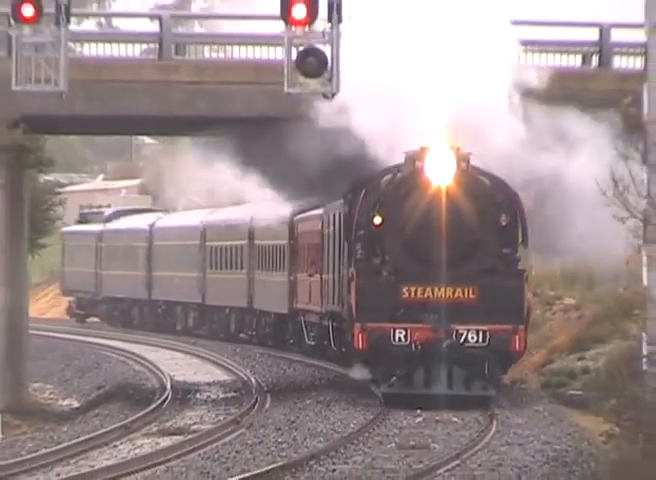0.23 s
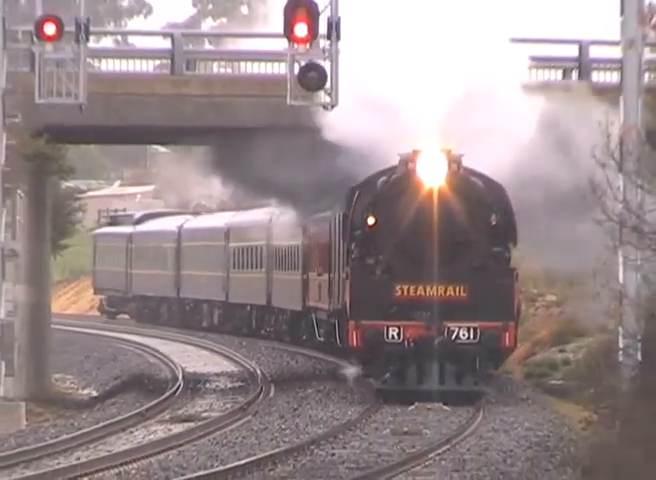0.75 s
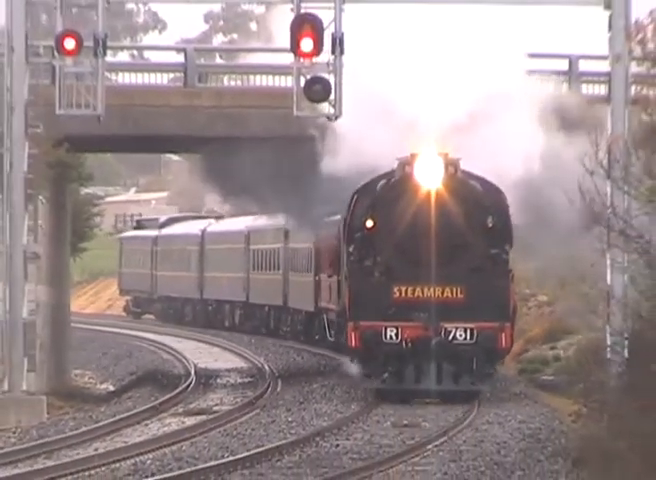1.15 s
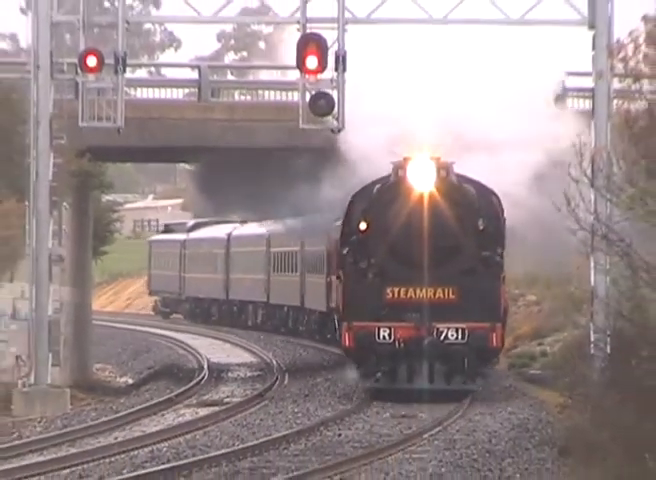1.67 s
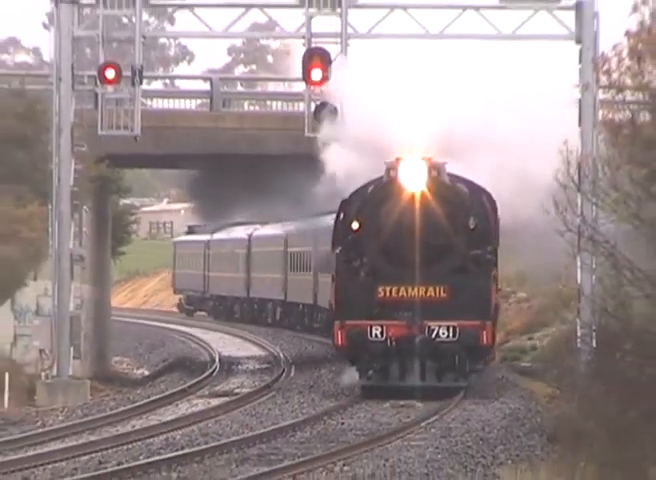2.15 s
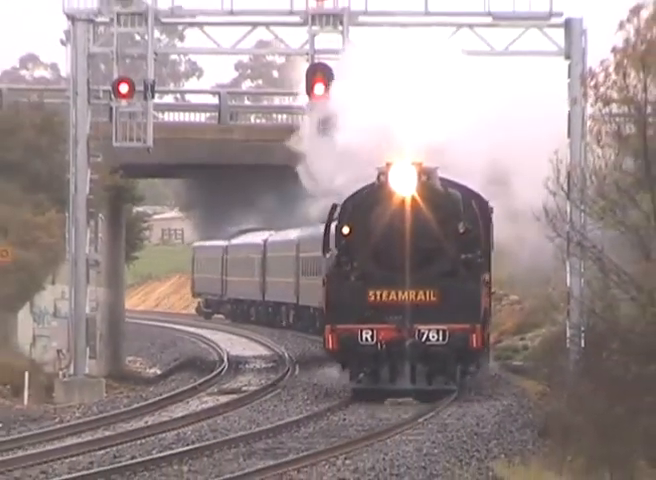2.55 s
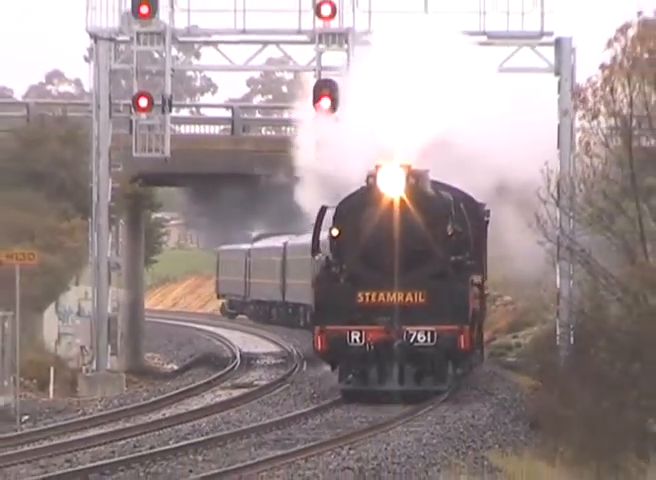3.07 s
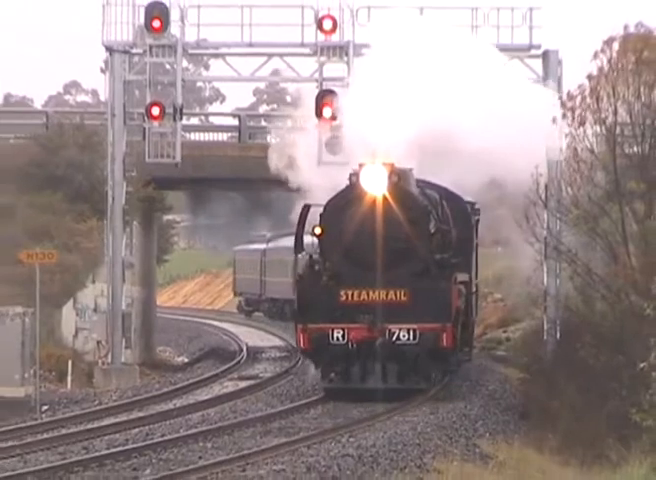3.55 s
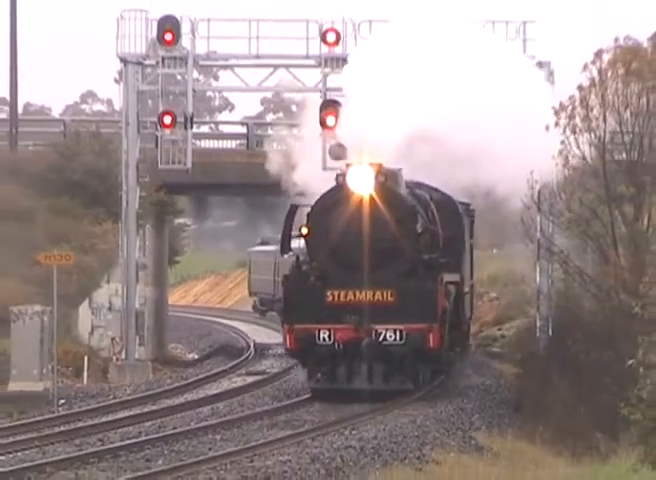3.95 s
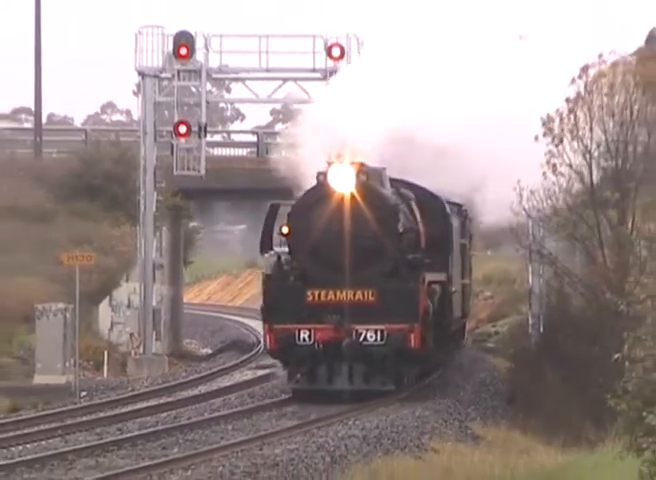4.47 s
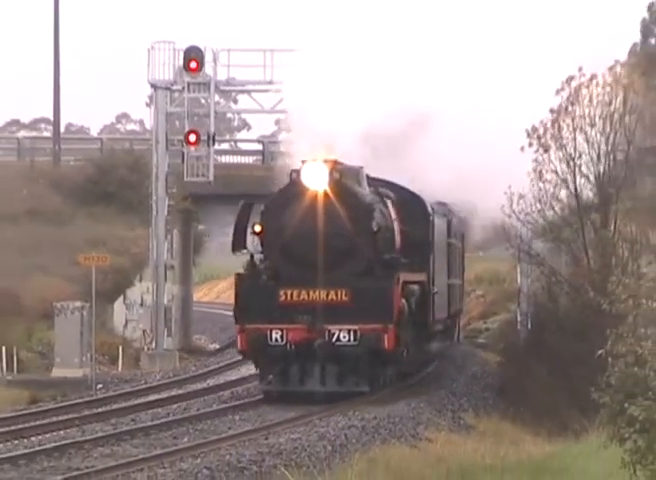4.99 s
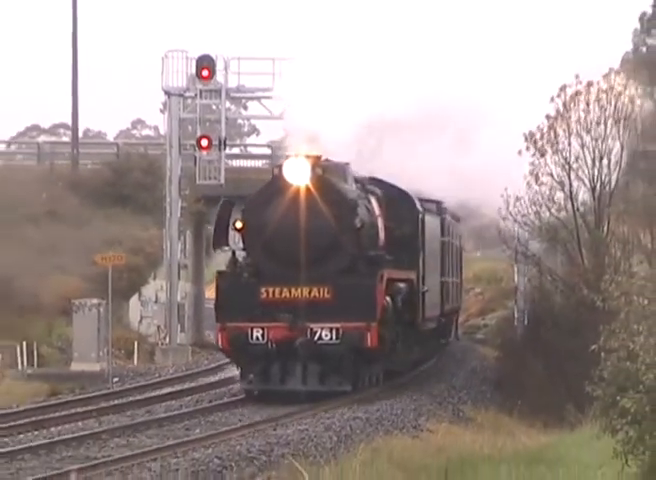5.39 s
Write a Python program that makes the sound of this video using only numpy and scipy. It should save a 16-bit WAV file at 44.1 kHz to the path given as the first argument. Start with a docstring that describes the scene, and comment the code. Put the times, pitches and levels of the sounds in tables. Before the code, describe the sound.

Loud, surging steam hiss grows as a locomotive draws near, its chimney throbbing and wheels thudding over rail joints while wind buffets the microphone.

```python
"""Steam locomotive blowing off

An engine rolls under a road bridge and draws near with its train, blowing off steam by the cylinders.
The jets hiss, sing, surge, spit water and ring in their drain pipes. Beneath them the chimney roars
and throbs, the wheels rumble and knock over rail joints, and the coaches follow with an even rush.
Gusts buffet the stereo microphone at the lineside, and a small bird chirps once."""
import sys
import numpy as np
from scipy import signal
from scipy.fft import rfft, irfft, next_fast_len
from scipy.io import wavfile
from scipy.ndimage import uniform_filter1d

SR = 44100
rng = np.random.default_rng(int(sys.argv[2]) if len(sys.argv) > 2 else 0)


def output_pcm(signal):
    """Save a mono or channel-first signal as 16-bit PCM at the path in sys.argv[1].

    Samples are clipped to [-1, 1] before scaling.
    """
    pcm = np.clip(np.atleast_2d(signal).T, -1, 1) * 32767
    wavfile.write(sys.argv[1], SR, np.round(pcm).astype(np.int16))


N = 248283
TIME = np.arange(N) / SR
SIZE = next_fast_len(N, True)
HZ = np.maximum(np.arange(SIZE // 2 + 1) * SR / SIZE, 1)

# the engine's low end, wheels and exhaust: time_s, rumble_gain_db, throb_gain_db
LOW_END = [(0, -51, -48.5), (.75, -49.5, -46), (1.1, -48.5, -46), (2.2, -45, -45), (3, -44.5, -44),
           (3.6, -45, -48.5), (4.3, -43, -40.5), (4.45, -44, -43.5), (4.62, -44, -46.5), (5.05, -43, -40.5),
           (5.28, -40.5, -52), (5.45, -39, -46), (5.63, -42.5, -48)]


def from_db(db):
    return 10 ** (np.asarray(db) / 20)


def rms_one(x):
    return x / np.sqrt(np.mean(x ** 2) + 1e-20)


def in_time(rows):
    """One envelope per value column, in straight lines between breakpoints."""
    times, *columns = np.transpose(rows)
    return [np.interp(TIME, times, column) for column in columns]


def bell(peak_s, sigma_s):
    """A rounded swell of height 1."""
    return np.exp(-.5 * ((TIME - peak_s) / sigma_s) ** 2)


def burst(peak_s, attack_s, release_s):
    """An exponential rise to 1 and an exponential fall."""
    return np.exp(-np.maximum((peak_s - TIME) / attack_s, (TIME - peak_s) / release_s))


def over_hz(points):
    """Breakpoints joined by straight lines on a log-frequency axis."""
    hz, value = np.transpose(points)
    return np.interp(np.log(HZ), np.log(hz), value)


def colour(points):
    """Gain of an EQ curve that rolls off beyond its ends."""
    skirts = np.minimum(HZ / points[0][0], 1) * np.minimum(points[-1][0] / HZ, 1)
    return from_db(over_hz(points)) * skirts ** 2


def resonances(modes):
    """Gain of rounded peaks that add in power."""
    powers = (from_db(2 * db) / (1 + ((HZ - hz) / width * 1.41) ** 2) ** 2 for hz, width, db in modes)
    return np.sqrt(sum(powers))


def white():
    """The spectrum of fresh white noise."""
    return rfft(rng.standard_normal(SIZE))


def drift(rate_hz):
    """A smooth random wobble; rms 1."""
    return rms_one(irfft(white() / (1 + (HZ / rate_hz) ** 2), SIZE)[:N])


def steady(x, span_s):
    """Level a noise so that its mean power stays near 1 over the given span."""
    power = uniform_filter1d(np.mean(np.atleast_2d(x) ** 2, axis=0), max(int(span_s * SR), 2))
    return x / np.sqrt(power + 1e-20)


def airborne(gain, span_s=0.41):
    """Coloured noise at the two capsules: a direct wave plus scatter from the cutting; rms about 1."""
    # stereo width: freq_hz, side_level_db
    scatter_share = [(80, -22), (300, -12), (550, -12.5), (1000, -13.5), (1800, -17), (2500, -13.5),
                     (4000, -12.5), (6000, -10), (7000, -55)]
    # stereo balance: freq_hz, left_minus_right_db
    balance = [(60, 2.5), (200, 4), (320, 2), (450, 4.5), (750, 1), (1500, 0.8), (4000, -1.2), (7000, -0.5)]
    # phase between the capsules: freq_hz, left_lead_rad
    phase_lead = [(300, -0.55), (800, .06), (2000, 0.0017), (3000, -0.1), (4500, 0.51), (6100, 0.74),
                  (6700, -0.15)]
    sides = np.array([[1], [-1]])
    direct = white() * np.exp(.5j * sides * over_hz(phase_lead))
    scatter = sides * white() * from_db(over_hz(scatter_share))
    pan = from_db(sides * over_hz(balance) / 2)
    return steady(irfft((direct + scatter) * gain * pan, SIZE)[:, :N], span_s)


def breathy(pitch_hz, width_hz):
    """A narrow band of noise carried along a pitch; rms about 1."""
    centre_hz = np.mean(pitch_hz)
    band = airborne(resonances([(centre_hz, width_hz, 0)]), span_s=0.074)
    glide = np.exp(2j * np.pi * np.cumsum(pitch_hz - centre_hz + np.zeros(N)) / SR)
    return np.real(signal.hilbert(band, SIZE)[:, :N] * glide)


def steam_jets(hiss_db=-1.27, sizzle_db=-4.5, pipe_db=-4.5, flutter_db=0.48, sputter_db=1.13):
    """Turbulent jets: a broad hiss, ringing pipes, and a sizzle that flares with wet steam."""
    # the flow as the engine nears: time_s, gain_db, ring_boost_db
    flow = [(0, -31.5, 3.5), (1.1, -30, 0.5), (1.5, -28, 0.5), (2.05, -28, 2.5), (2.92, -29.5, 1.8),
            (3.2, -28.5, 1.5), (3.62, -28.5, 2), (3.98, -27, 2.5), (4.4, -24.5, 2.5), (4.7, -22, 2),
            (5.1, -22.5, 1.5), (5.24, -23.5, 0), (5.42, -22.5, 0.5), (5.63, -23, 3.5)]
    # surges of steam: peak_s, sigma_s, hiss_boost_db, ring_boost_db
    surges = [(0.29, 0.076, 0.3, 2.5), (1.292, 0.025, 0.3, 3.5), (1.46, 0.033, 1.3, 1.5),
              (1.745, 0.082, 4, -0.5), (1.862, 0.089, 1, 0.7), (2.373, 0.037, 0.9, -0.5),
              (2.66, 0.046, 1.5, 0.5), (3.21, 0.046, 0.5, 0), (3.77, 0.061, 0, 0.5),
              (4.254, 0.063, 1.5, -0.2), (4.566, 0.032, 0, 4), (4.675, 0.043, 0, 3),
              (5.184, 0.034, 0.5, 2.5), (5.302, 0.028, 0, 3.5), (5.57, 0.03, 2.5, -1.2)]
    # spurts of wet steam: peak_s, attack_s, release_s, sizzle_boost_db
    spurts = [(1.735, 0.094, 0.066, 7.5), (4.67, .02, 0.054, 3), (5.53, 0.11, 0.17, 4.5)]
    # body of the hiss: freq_hz, gain_db
    hiss_eq = [(700, -11.5), (1300, -9), (2500, -0.5), (3100, 3), (3350, 4), (3650, 2), (4300, 4.5),
               (4700, 2.5), (5300, 2.9), (6300, 0), (7500, -6), (9500, -13.5), (12000, -58)]
    # bright sizzle on top: freq_hz, gain_db
    sizzle_eq = [(4500, -10.5), (6200, -3.5), (7300, 3), (8500, 2.5), (9600, 1), (10400, -3), (11200, -5.5),
                 (11800, -22.5)]
    flow_db, ring_db = in_time(flow)
    surge_db = sum(db * bell(s, sigma_s) for s, sigma_s, db, _ in surges)
    ring_db += sum(db * bell(s, sigma_s) for s, sigma_s, _, db in surges)
    bright_db = np.interp(TIME, [2.7, 4], [-8.5, -5.5])  # opens up as the engine clears the bridge
    bright_db += sum(db * burst(s, attack_s, release_s) for s, attack_s, release_s, db in spurts)
    hiss = from_db(hiss_db + surge_db) * airborne(colour(hiss_eq))
    ring = from_db(pipe_db + ring_db) * drain_pipes()
    sizzle = from_db(sizzle_db + bright_db + sputter_db * drift(31)) * airborne(colour(sizzle_eq))
    return (hiss + ring + sizzle) * from_db(flow_db + flutter_db * drift(25))


def drain_pipes(gargle_db=0.38, deep_db=-4, swing_db=0.7, cycle_s=1.16):
    """Steam rushes through two pipes whose balance sways slowly back and forth; rms about 1."""
    # ring of the higher pipe: freq_hz, width_hz, gain_db
    high_modes = [(2130, 420, 0.5), (2400, 200, -0.5), (2600, 150, 0.5), (2830, 215, 1)]
    # ring of the deeper pipe: freq_hz, width_hz, gain_db
    deep_modes = [(1560, 400, -0.5), (1776, 180, -1)]
    deep_gain = from_db(deep_db + swing_db * np.cos(2 * np.pi * TIME / cycle_s))
    high = airborne(resonances(high_modes), span_s=0.11)
    deep = deep_gain * airborne(resonances(deep_modes), span_s=0.2)
    return (high + deep) / np.sqrt(1 + deep_gain ** 2) * from_db(gargle_db * drift(31))


def singing_jet(overtones_db=-33):
    """Eddies at a nozzle lip lock loosely into a breathy, wandering tone; its overtones flare once."""
    # the jet's note: time_s, pitch_hz, level_db
    edge_tone = [(0, 2402, -51), (.33, 2356, -43), (.9, 2370, -44), (1.28, 2320, -38.5), (1.48, 2400, -55),
                 (1.66, 2520, -37), (1.74, 2357, -35), (1.85, 2335, -33), (2.1, 2405, -38.5),
                 (2.6, 2330, -40), (2.88, 2338, -44), (3.0, 2345, -41), (3.22, 2373, -35),
                 (3.38, 2398, -43), (5.63, 2404, -42)]
    # its upper resonances: freq_hz, width_hz, gain_db
    overtones = [(4620, 150, -6), (5130, 300, -9), (6850, 660, 1), (8950, 300, -15)]
    pitch_hz, level_db = in_time(edge_tone)
    tone = from_db(level_db) * breathy(pitch_hz, width_hz=170)
    flare = from_db(overtones_db) * burst(peak_s=1.6, attack_s=0.066, release_s=0.066)
    return tone + flare * airborne(resonances(overtones), span_s=.08)


def chimney(roar_db=0.68, throb_db=1.5, chuff_db=0.64, chuffs_per_s=10.7):
    """Soft exhaust beats run together into a roar above a low throb."""
    # how hard the exhaust works: time_s, roar_gain_db
    effort = [(0.0, -35.5), (1.21, -40), (1.24, -37.5), (2.38, -35.5), (4.08, -41), (4.15, -36.5),
              (4.52, -35.5), (4.55, -31), (4.61, -35), (5.28, -35), (5.5, -31.5), (5.63, -37.5)]
    # the heaviest beats: peak_s, throb_boost_db
    heavy_beats = [(0.35, 8), (1.99, 9), (2.36, 5), (2.595, 9), (4.512, 5), (4.715, 5), (4.82, 8),
                   (4.905, 9), (5.51, 11), (5.595, 7)]
    # midrange roar: freq_hz, gain_db
    roar_eq = [(400, -15), (560, -7.5), (690, -6), (790, -1), (900, 0.3), (1020, -1), (1190, -3),
               (1350, -3.5), (1550, -5), (2500, -19)]
    # bass throb: freq_hz, gain_db
    throb_eq = [(12, -24), (22, -6), (38, -9.5), (55, 1), (86, 3.5), (110, 0.5), (160, -14), (400, -55)]
    effort_db, = in_time(effort)
    _, weight_db = in_time(LOW_END)
    chuffs = np.cos(2 * np.pi * chuffs_per_s * TIME + 0.67 * drift(1.5))
    accent_db = sum(db * bell(s, sigma_s=0.016) for s, db in heavy_beats)
    roar = from_db(effort_db + roar_db + chuff_db * chuffs) * airborne(colour(roar_eq))
    throb = from_db(weight_db + throb_db + accent_db) * airborne(colour(throb_eq), span_s=0.097)
    return roar + throb


def wheels(rumble_db=0.7, jolt_db=2.5):
    """Wheels roll on rough rail; each joint adds a short, solid thud."""
    # knocks over rail joints: peak_s, gain_db
    joints = [(2.02, 3), (2.22, -3), (2.32, 3), (2.44, 5), (2.69, 8), (2.79, 5), (3.01, 5), (3.33, 2),
              (4.05, 2), (4.52, 2), (4.625, 3), (4.70, 8), (4.828, 8.5), (4.905, 12), (4.978, 10),
              (5.09, 0), (5.2, -3), (5.27, 2), (5.372, 8), (5.47, -3), (5.59, 0)]
    # body of both rumble and thuds: freq_hz, gain_db
    wheel_eq = [(60, -21), (120, -4.5), (172, -0.5), (215, -6.5), (300, -7.5), (400, -25), (800, -15)]
    level_db, _ = in_time(LOW_END)
    rumble = from_db(rumble_db + jolt_db * drift(18)) * airborne(colour(wheel_eq), span_s=0.07)
    knocks = sum(from_db(db) * bell(s, sigma_s=0.013) for s, db in joints)
    thuds = knocks * airborne(colour(wheel_eq), span_s=0.025)
    return from_db(level_db) * (rumble + thuds)


def coaches():
    """The far coaches roll with a smooth, even rush."""
    # the train following on the curve: time_s, level_db
    rush = [(0, -42), (.4, -40.5), (.75, -42.5), (1.2, -41), (1.7, -40), (2.4, -40.5), (3.5, -40.5),
            (5.63, -41.5)]
    # low-mid rolling noise: freq_hz, gain_db
    rolling_eq = [(130, -7), (215, -9.5), (260, -3), (320, 0), (400, -3), (480, -2), (570, 0), (700, -3.5),
                  (1100, -14), (2000, -30)]
    level_db, = in_time(rush)
    return from_db(level_db) * airborne(colour(rolling_eq))


def gust(start_s, hold_s, attack_s=.011, release_s=.017):
    """The envelope of a gust: a quick rise, a hold at 1 and a quick fall."""
    falloff = np.maximum((start_s - TIME) / attack_s, (TIME - start_s - hold_s) / release_s)
    return np.exp(-np.maximum(falloff, 0))


def wind(breeze_db=-49):
    """Eddies push the two channels in opposite senses: large ones rumble, small ones buffet higher up."""
    # gusts on the microphone: start_s, hold_s, rumble_db, buffet_db
    gusts = [(0.16, .05, -41, -55), (0.222, 0.028, -31, -40), (0.56, 0.15, -33, -37), (0.74, .11, -43, -52),
             (0.858, .19, -30, -35), (1.074, 0.03, -32, -29), (1.125, .09, -41, -50), (1.28, 0.1, -43, -52),
             (1.59, 0.12, -29, -41), (1.74, .135, -42, -53), (2.09, .09, -35, -45), (2.23, .085, -31, -45),
             (2.33, .07, -41, -52), (2.573, 0.037, -25, -35), (2.81, .09, -40, -53), (2.97, .125, -39, -41),
             (3.105, 0.041, -23, -28), (3.185, .035, -41, -45), (3.503, .035, -31, -52),
             (3.98, .03, -34, -47), (4.07, .11, -28, -39), (4.2, .07, -40, -52), (4.735, 0.041, -32, -46),
             (4.858, .11, -31, -43), (4.99, .14, -18, -23.5), (5.16, 0.092, -34, -43),
             (5.43, 0.057, -32, -39), (5.595, .04, -29, -34)]
    # large eddies: freq_hz, gain_db
    rumble_eq = [(10, -26), (20, -12), (35, 6), (58, -1), (85, -4), (110, -14), (170, -30), (300, -46)]
    # small eddies: freq_hz, gain_db
    buffet_eq = [(70, -12), (115, 4), (155, -3), (200, -16), (250, -12), (300, -27), (500, -42)]
    rumble = np.max([from_db(db) * gust(s, hold_s) for s, hold_s, db, _ in gusts], axis=0)
    buffet = np.max([from_db(db) * gust(s, hold_s) for s, hold_s, _, db in gusts], axis=0)
    large = steady(irfft(white() * colour(rumble_eq), SIZE)[:N], span_s=.04)
    small = steady(irfft(white() * colour(buffet_eq), SIZE)[:N], span_s=.04)
    pressure = (rumble + from_db(breeze_db)) * large + buffet * small
    return pressure * np.array([[1], [-1]])


def bird():
    """One thin, gliding note, nearly buried in the hiss."""
    # the chirp: time_s, pitch_hz, level_db
    chirp = [(0.51, 6660, -71), (0.525, 6660, -37), (0.54, 6340, -40), (0.555, 6700, -43),
             (0.572, 7150, -42), (0.592, 6700, -39), (0.61, 6500, -80)]
    pitch_hz, level_db = in_time(chirp)
    sounding = (TIME > chirp[0][0]) & (TIME < chirp[-1][0])
    return sounding * from_db(level_db) * np.sqrt(2) * np.sin(2 * np.pi * np.cumsum(pitch_hz) / SR)


def pipe_notes():
    """Close by, one pipe resonance after another briefly stands out of the rush."""
    # breathy notes: peak_s, sigma_s, pitch_hz, level_db
    notes = [(3.78, 0.17, 2160, -35.5), (4.04, 0.098, 2840, -34), (4.662, .04, 2400, -33),
             (4.82, 0.093, 2130, -30), (5.61, .04, 2770, -31)]
    return sum(from_db(db) * bell(s, sigma_s) * breathy(hz, width_hz=140) for s, sigma_s, hz, db in notes)


def spits():
    """Water caught in a jet bursts into fine spray with a short, bright sputter."""
    # slugs of water in quick succession: peak_s, level_db
    slugs = [(4.595, -30), (4.626, -22.5), (4.658, -29)]
    # fine spray: freq_hz, gain_db
    spray_eq = [(3500, -6), (6000, -3), (7300, 2), (9000, 2), (10200, 4), (11200, -24)]
    envelope = sum(from_db(db) * burst(s, attack_s=0.0044, release_s=0.017) for s, db in slugs)
    return envelope * airborne(colour(spray_eq))


def scene():
    """The train ahead, a bird at the lineside, the wind at the microphone."""
    steam = steam_jets() + spits() + singing_jet() + pipe_notes()
    return steam + chimney() + wheels() + coaches() + bird() + wind()


def record(dry, cutoff_hz=11500):
    """A steep low-pass takes off the very top."""
    return signal.sosfilt(signal.ellip(10, .1, 90, cutoff_hz, fs=SR, output="sos"), dry)


dry = scene()
out = record(dry)
output_pcm(out)
```